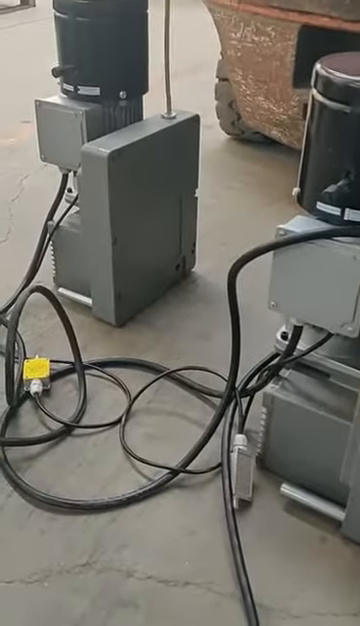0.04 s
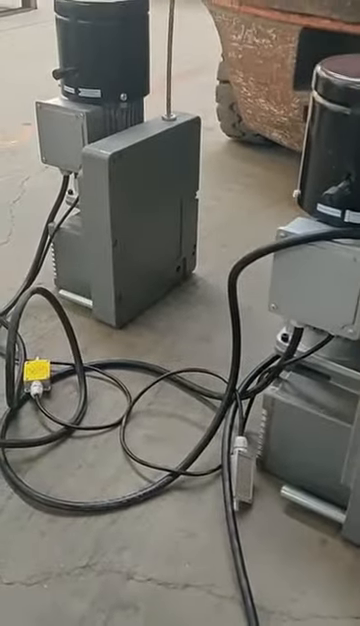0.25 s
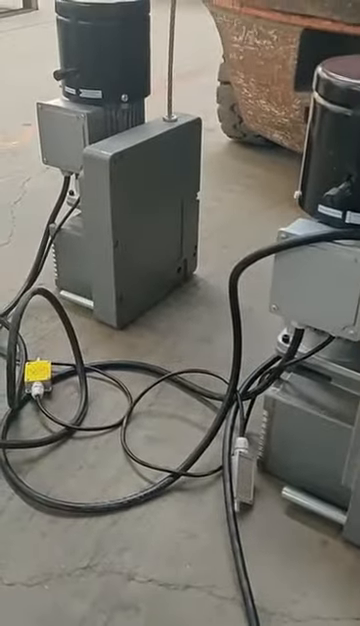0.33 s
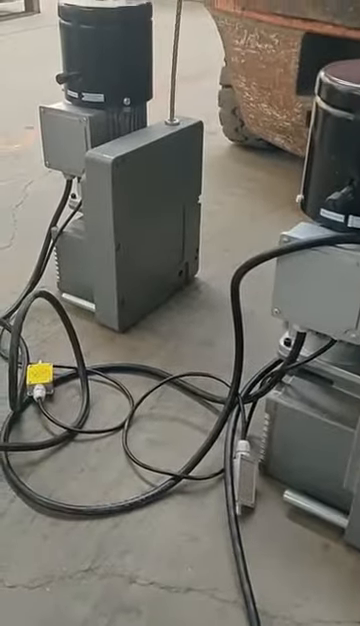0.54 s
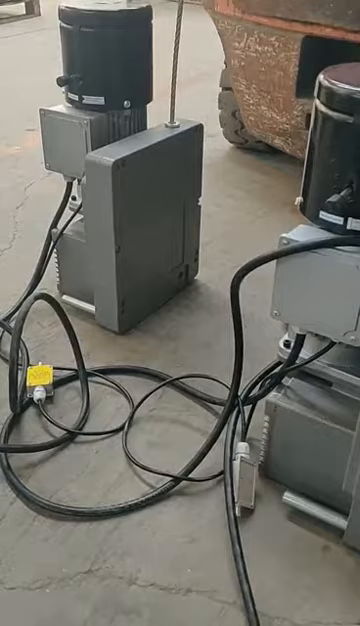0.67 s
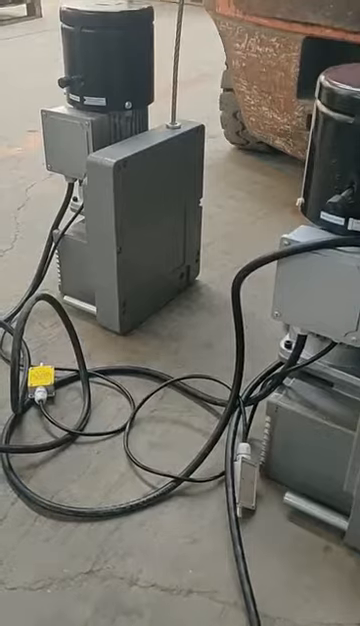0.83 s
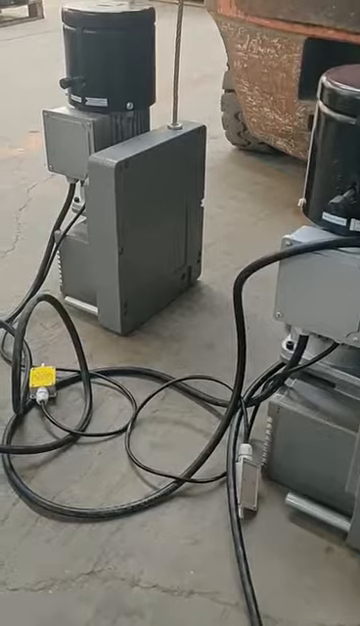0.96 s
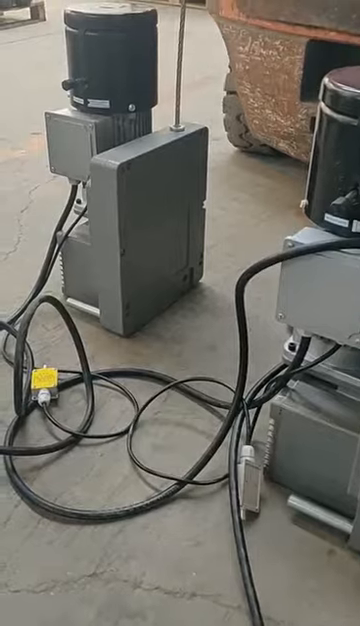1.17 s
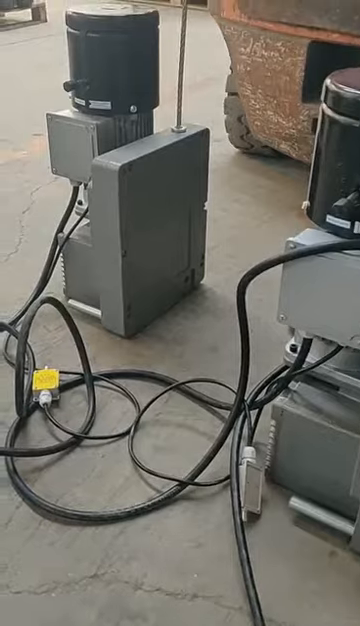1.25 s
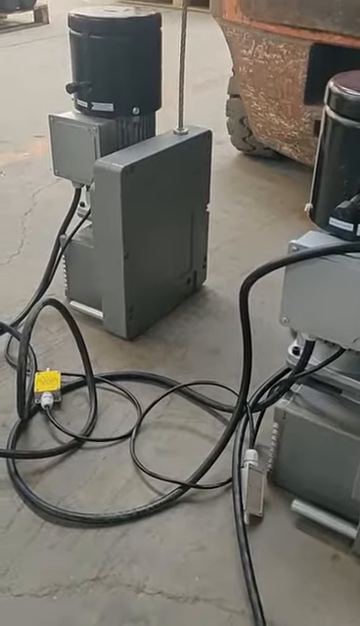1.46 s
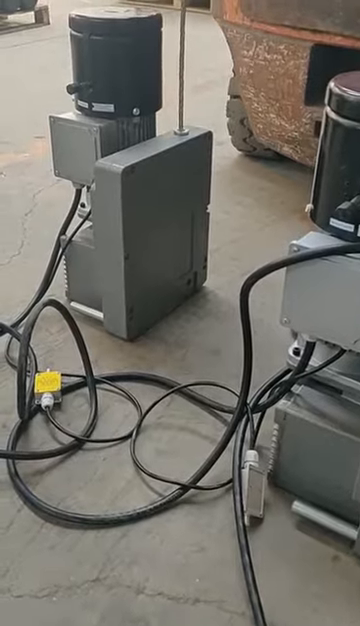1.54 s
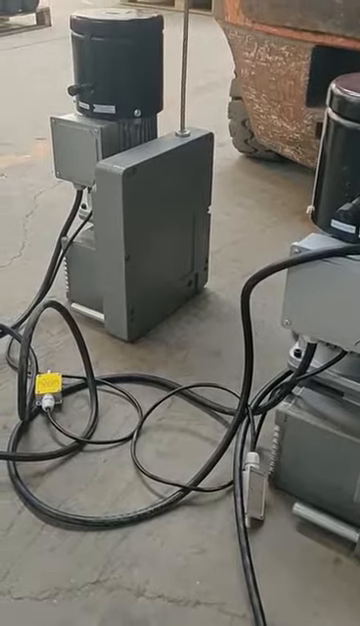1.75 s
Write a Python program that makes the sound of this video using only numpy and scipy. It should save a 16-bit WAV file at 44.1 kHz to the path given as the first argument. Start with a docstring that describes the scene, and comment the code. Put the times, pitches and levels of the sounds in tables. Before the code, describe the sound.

A loose steel part knocks twice right at the start: a dull scraping clunk, then a bright clack. A hollow metal ring fades into a concrete hall where distant machinery hums steadily, heard from a few metres away.

```python
"""Distant machinery hums, drones and washes through a concrete storage hall. Almost at once a loose
steel part is knocked twice: a tick and a dull, scraping clunk, then a bright chattering clack.
The blows ring the steel and a hollow housing and die away in the hall; faint swishes and a low
rumble follow. A phone with two microphone ports hears it from a few metres."""
import sys
import numpy as np
from scipy import signal
from scipy.fft import rfft, irfft
from scipy.io import wavfile
from scipy.ndimage import uniform_filter1d, minimum_filter1d

SR = 44100
rng = np.random.default_rng(int(sys.argv[2]) if len(sys.argv) > 2 else 0)


def int16_out(signal):
    """Quantize to a 16-bit WAV file."""
    q = np.round(np.clip(np.atleast_2d(signal).T, -1, 1) * 32767)
    wavfile.write(sys.argv[1], SR, q.astype(np.int16))


N = 79380
TIME_S = np.arange(N) / SR
BIN_HZ = np.arange(N // 2 + 1) * SR / N
SIDE_SIGN = np.array([[1], [-1]])  # left, right
CONTACT_S = .00034

# diffuse sound, likeness of the ports (frequency [Hz], correlation [-])
PORT_CORRELATION = [(60, 1), (170, 0.98), (350, 0.86), (700, 0.6), (1400, 0.17), (2800, 0.13),
                    (5000, 0.074)]
# diffuse sound, port balance (frequency [Hz], left-right [dB])
PORT_BALANCE = [(700, 0), (1500, 1), (2000, -2), (2600, -5), (3400, -3), (4600, -7), (5600, 12), (7000, 12)]
# motor hum envelope (time [s], level [dB])
HUM_ENVELOPE = [(0, -38), (.3, -36), (.55, -35), (.9, -37), (1.1, -35.5), (1.45, -36.5), (1.62, -46.5),
                (1.8, -38)]
# machinery resonances (frequency [Hz], width [Hz], level [dB])
DRONE_BANDS = [(123.3, 1.2, -53), (263.7, 35, -47.5), (396.2, 6.4, -49), (414.7, 18, -49), (473, 17, -48),
               (744.6, 49, -47), (1019, 22, -49), (1107, 43, -49.5), (1438.5, 70, -47)]
# drone envelope (time [s], gain [dB])
DRONE_ENVELOPE = [(0, -20.5), (.2, 1.5), (.45, 0), (1.2, 0.5), (1.8, -1.5)]
# machinery wash spectrum (frequency [Hz], relative density [dB])
WASH_SPECTRUM = [(25, -11), (45, -4), (62, -9), (85, -2.5), (115, -10), (170, -7.5), (250, -13.5),
                 (330, -15), (420, -16), (550, -12.5), (1000, -12), (1600, -15.5), (2100, -16.5),
                 (2850, -19), (3100, -29), (4600, -35), (5500, -46), (7200, -46), (8000, -92.5)]
# wash envelope (time [s], gain [dB])
WASH_ENVELOPE = [(0, -5), (.1, 3), (.5, 0), (.9, -.5), (1.3, 0.5), (1.8, -0.5)]
# rumble envelope (time [s], level [dB])
RUMBLE_ENVELOPE = [(0, -44.5), (1.0, -62.5), (1.2, -49.5), (1.45, -38), (1.6, -40), (1.8, -39.5)]
# treble swishes (peak time [s], half length [s], frequency [Hz], width [Hz], level [dB])
SWISH_EVENTS = [(0.987, 0.027, 4520, 2300, -50.5), (1.62, 0.013, 2810, 200, -43),
                (1.628, 0.22, 6390, 980, -64.5)]
# hall reverberation (frequency [Hz], t60 [s])
HALL_DECAY = [(150, 0.95), (500, 3.14), (1500, 0.69), (4000, 1.09), (7500, 0.4)]
# early echo spectrum (frequency [Hz], relative level [dB])
ECHO_SPECTRUM = [(200, 9.5), (420, 1.5), (750, 7), (1080, -11), (1650, 1), (3300, 4), (4150, 18),
                 (4600, 7.5), (5500, 9.5), (7500, -3)]
# housing modes (frequency [Hz], relative level [dB], t60 [s], left-right [dB], left lead [rad])
HOUSING_MODES = [(413, 1, .65, 1, 0), (684, -3, .3, 0, 0), (872, -6, .4, -2, 0), (1432, -2, .45, -2, 0),
                 (1523, 0, .2, 1, 0), (1745, -3, .15, -3, 0), (3074, -6, .2, 0, 0), (4118, -3, .25, -8, 1)]
# dull blows (time [s], gain [dB], noise t60 [s], thud gain [dB], thud frequency [Hz])
CLUNK_BLOWS = [(0.0872, -9, 0.06, -8, 261), (0.091, -11, 0.15, -2.5, 256.6),
               (0.1069, -13.5, 0.08, -1, 249.4), (0.117, 0.5, 0.09, -19, 240), (0.1208, -4, 0.1, -10, 243),
               (0.131, -15, 0.087, 7.5, 257.4), (0.137, -24.5, .07, 9.5, 135.7),
               (0.155, -17, 0.11, 2.5, 426)]
# dull blow noise spectrum (frequency [Hz], relative level [dB])
CLUNK_SPECTRUM = [(100, -36), (250, -18), (750, -11), (1200, -16.5), (3000, -15), (4500, -23), (7000, -31),
                  (8000, -40), (10000, -68)]
# dull blow modes (frequency [Hz], relative level [dB], t60 [s], left-right [dB], left lead [rad])
CLUNK_MODES = [(620, -7, .035, 0, 0), (964, 0, .018, 0, 0), (1560, -6, .05, 0, 0), (2150, -11, .03, 0, 0),
               (2770, -7, .035, -3, 0), (3060, -11, .03, -2, 0), (3790, -14, .04, 0, 0)]
# clack contacts (time [s], gain [dB], low-pass cutoff [Hz])
CLACK_CONTACTS = [(0.2, -5.5, 6500), (0.2009, 2.5, 6020), (0.2051, -6.5, 5470), (0.2079, -8, 2450)]
# contact crack spectrum (frequency [Hz], relative level [dB])
CRACK_SPECTRUM = [(200, -30.5), (450, -28.5), (750, -10.5), (1100, -13.5), (1530, -8.5), (2100, -9.5),
                  (2900, -11.5), (3600, -5.5), (4050, -20), (4400, -16), (5200, -11.5), (5900, -25.5),
                  (7200, -23.5), (8000, -33), (10000, -53.5)]
# steel modes (frequency [Hz], relative level [dB], t60 [s], left-right [dB], left lead [rad])
STEEL_MODES = [(640, -9, .1, 0, 0), (730, -10, .08, 0, 0), (850, -8, .06, -1, 0), (1430, -2, .045, 0, 0),
               (1545, -3, .03, 0, 0), (1627, -3, .03, 0, 0), (2168, -3, .016, 0, 0),
               (2500, -3, .022, -11, 0), (3330, -1, .015, -3, .5), (3560, 0, .012, 0, .5),
               (4570, -6, .025, -2, 2.7), (5130, -6, .014, -1, 2.6)]


def undb(db):
    """Decibels to gain."""
    return 10 ** (np.asarray(db) / 20)


def unit_rms(x):
    """Scale to rms 1."""
    return x / np.sqrt(np.mean(x ** 2))


def unit_energy(x):
    """Scale to mean channel energy 1."""
    return unit_rms(x) / np.sqrt(N)


def over_hz(points):
    """Interpolate a table over log frequency."""
    hz, value = np.array(points).T
    return np.interp(np.log(BIN_HZ + 1), np.log(hz), value)


def envelope(points):
    """Gain per sample from (time [s], level [dB])."""
    return undb(np.interp(TIME_S, *np.array(points).T))


def resonance(hz, width_hz):
    """Gain per bin of a steep resonance; width at -6 dB."""
    f = BIN_HZ + 1
    return 1 / (1 + ((f / hz - hz / f) * hz / width_hz) ** 2)


def decay(start_s, t60_s, rise_s):
    """Rise, then exponential decay."""
    age_s = np.maximum(TIME_S - start_s, 0)
    return (1 - np.exp(-age_s / rise_s)) * np.exp(-np.log(1000) * age_s / t60_s)


def mono_noise(colour):
    """Coloured noise, rms 1."""
    return unit_rms(irfft(rfft(rng.standard_normal(N)) * colour, N))


def diffuse_noise(colour):
    """Coloured stereo noise from all round, rms 1."""
    mid, side = rfft(rng.standard_normal((2, N)))
    correlation = np.clip(over_hz(PORT_CORRELATION), -.99, .9999)
    spectrum = mid * np.sqrt(1 + correlation) + SIDE_SIGN * side * np.sqrt(1 - correlation)
    balance = undb(SIDE_SIGN * over_hz(PORT_BALANCE) / 2)
    return unit_rms(irfft(spectrum * colour * balance, N))


def noise_burst(spectrum, start_s, t60_s):
    """Contact noise, equal parts frontal and diffuse."""
    colour = undb(over_hz(spectrum))
    noise = mono_noise(colour) + diffuse_noise(colour)
    return unit_energy(noise * decay(start_s, t60_s, CONTACT_S))


def ringing(modes, start_s, rise_s, phases_cycles):
    """Decaying modes, each with its own balance and phase between the ports."""
    out = 0
    for (hz, db, t60_s, pan_db, lead_rad), cycles in zip(modes, phases_cycles):
        tone = np.sin(2 * np.pi * (hz * TIME_S + cycles) + SIDE_SIGN * lead_rad / 2)
        mode = unit_energy(tone * decay(start_s, t60_s, rise_s))
        out = out + mode * undb(db + SIDE_SIGN * pan_db / 2)
    return out


def port_lag(x, lag_s):
    """Sound reaches the right port later."""
    shift = np.exp(-2j * np.pi * BIN_HZ * lag_s)
    return np.array([x[0], irfft(rfft(x[1]) * shift, N)])


def motor_hum(hz=61.6, wander_depth=.0076, octave_db=-15):
    """Motor fundamental and octave, wavering in pitch."""
    wander = mono_noise(resonance(.93, width_hz=14))
    phase_rad = 2 * np.pi * np.cumsum(hz * (1 + wander_depth * wander)) / SR
    tone = np.sin(phase_rad) + undb(octave_db) * np.sin(2 * phase_rad)
    return np.sqrt(2) * tone * envelope(HUM_ENVELOPE)


def drones():
    """Machinery resonances: narrow noise bands."""
    bands = sum(undb(db) * diffuse_noise(resonance(hz, width_hz)) for hz, width_hz, db in DRONE_BANDS)
    return bands * envelope(DRONE_ENVELOPE)


def wash(base_db=-36, flutter_hz=11, flutter_rms_db=1.22):
    """Broad machinery noise; the level flutters."""
    flutter_db = flutter_rms_db * mono_noise(resonance(flutter_hz, 2 * flutter_hz))
    noise = diffuse_noise(undb(over_hz(WASH_SPECTRUM)))
    return undb(base_db + flutter_db) * noise * envelope(WASH_ENVELOPE)


def rumble():
    """Low noise that ebbs, then swells."""
    return diffuse_noise(resonance(hz=143, width_hz=140)) * envelope(RUMBLE_ENVELOPE)


def swishes():
    """Faint hisses that come and go."""
    out = 0
    for peak_s, half_s, hz, width_hz, db in SWISH_EVENTS:
        swell = np.exp(-((TIME_S - peak_s) / half_s) ** 2)
        out = out + undb(db) * diffuse_noise(resonance(hz, width_hz)) * swell
    return out


def hall(x, early_db=-11, tail_db=-11):
    """Early echoes, then the long tail; the phone dulls both in a narrow band near 3.7 kHz."""
    noise, tail = rfft(diffuse_noise(1)), 0
    for hz, t60_s in HALL_DECAY:
        band = over_hz([(band_hz, band_hz == hz) for band_hz, _ in HALL_DECAY])
        tail = tail + irfft(noise * band, N) * decay(start_s=.018, t60_s=t60_s, rise_s=.025)
    early = diffuse_noise(undb(over_hz(ECHO_SPECTRUM)))  # off floor and nearby machines
    early *= decay(start_s=.016, t60_s=.2, rise_s=2 * CONTACT_S)
    response = undb(tail_db) * unit_energy(tail) + undb(early_db) * unit_energy(early)
    phone_notch = 1 - resonance(hz=3730, width_hz=400)
    response = irfft(rfft(response) * phone_notch, N)
    return signal.fftconvolve(x.mean(axis=0)[None], response, axes=-1)[:, :N]


def housing(gain_db=-.5, delay_s=.018, rise_s=.0036, mean_beat_hz=22, twin_db=-6):
    """Hollow metal housing rings on after the clack; each mode beats against a close twin."""
    start_s = CLACK_CONTACTS[0][0] + delay_s
    phases_cycles, twin_cycles, splits = rng.random((len(HOUSING_MODES), 3)).T
    twins = [(hz + mean_beat_hz * (split + .5), *rest)
             for (hz, *rest), split in zip(HOUSING_MODES, splits)]
    ring = ringing(HOUSING_MODES, start_s, rise_s, phases_cycles)
    twin_ring = ringing(twins, start_s, rise_s, twin_cycles)
    return undb(gain_db) * (ring + undb(twin_db) * twin_ring)


def clunk(noise_gain_db=9.5, ring_gain_db=2.5, thud_gain_db=11, thud_t60_s=.07):
    """The part ticks, scrapes and lands: noise, heavily damped modes, hollow thud."""
    out, phases_cycles = 0, rng.random(len(CLUNK_MODES))
    for start_s, db, t60_s, thud_db, thud_hz in CLUNK_BLOWS:
        knock = undb(noise_gain_db) * noise_burst(CLUNK_SPECTRUM, start_s, t60_s)
        ring = undb(ring_gain_db) * unit_energy(ringing(CLUNK_MODES, start_s, CONTACT_S, phases_cycles))
        tone = np.sin(2 * np.pi * thud_hz * (TIME_S - start_s))
        thud = unit_energy(tone * decay(start_s, thud_t60_s, 2 * CONTACT_S))
        out = out + undb(db) * (knock + ring + undb(thud_gain_db + thud_db) * thud)
    return out


def bending_dispersion(x, top_hz=3800, top_travel_s=.004):
    """Low bending waves run slower, so low modes arrive late."""
    hz = np.clip(BIN_HZ, STEEL_MODES[0][0] / 2, top_hz)
    delay_s = top_travel_s * (np.sqrt(top_hz / hz) - 1)
    phase_rad = 2 * np.pi * np.cumsum(delay_s) * SR / N
    return irfft(rfft(x) * np.exp(-1j * phase_rad), N)


def clack(ring_gain_db=9, crack_gain_db=16, crack_t60_s=.025):
    """Steel chatters on steel, duller as it settles; each contact cracks and rings the same modes."""
    out, phases_cycles = 0, rng.random(len(STEEL_MODES))
    for start_s, db, cutoff_hz in CLACK_CONTACTS:
        modes = unit_energy(ringing(STEEL_MODES, start_s, CONTACT_S, phases_cycles))
        ring = undb(ring_gain_db) * bending_dispersion(modes)
        crack = undb(crack_gain_db) * noise_burst(CRACK_SPECTRUM, start_s, crack_t60_s)
        lowpass = signal.butter(2, cutoff_hz, fs=SR, output="sos")
        out = out + undb(db) * signal.sosfilt(lowpass, ring + crack)
    return out


def scene():
    """Knocks reach the left port first; hall and machinery surround them."""
    knocks = clunk() + clack()
    direct = knocks + housing()
    surround = hall(knocks) + motor_hum() + drones() + wash() + rumble() + swishes()
    return port_lag(direct, lag_s=80e-6) + port_lag(surround, lag_s=30e-6)


def record(dry, ceiling=.95, window_s=.001, cutoff_hz=7550):
    """Phone: peak limiter, then steep low-pass."""
    span = int(window_s * SR)
    gain = ceiling / np.maximum(np.abs(dry).max(axis=0), ceiling)
    gain = uniform_filter1d(minimum_filter1d(gain, span), span)
    lowpass = signal.ellip(8, .2, 85, cutoff_hz, fs=SR, output="sos")
    return signal.sosfilt(lowpass, dry * gain)


dry = scene()
out = record(dry)
int16_out(out)
```